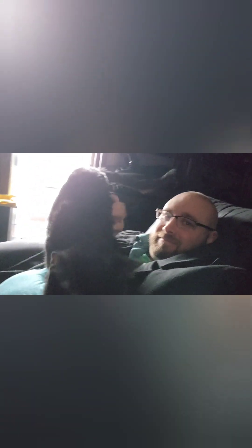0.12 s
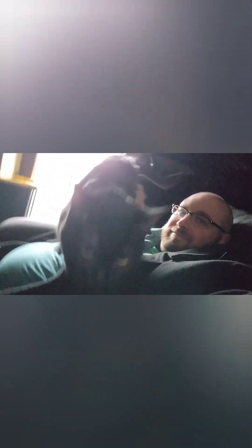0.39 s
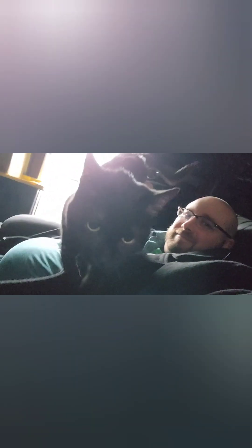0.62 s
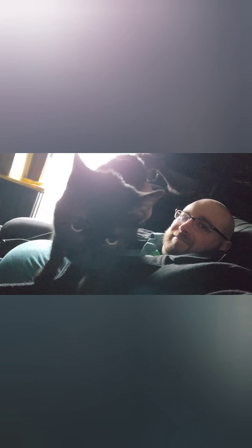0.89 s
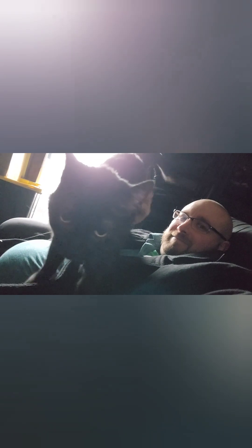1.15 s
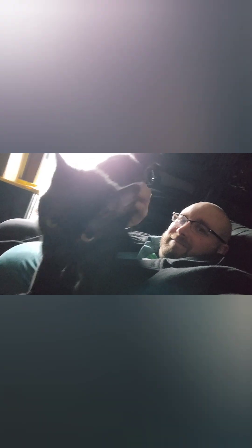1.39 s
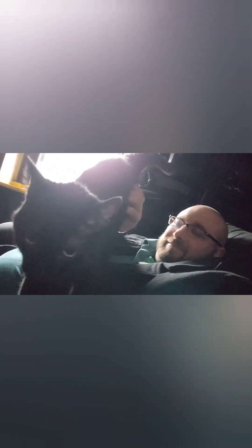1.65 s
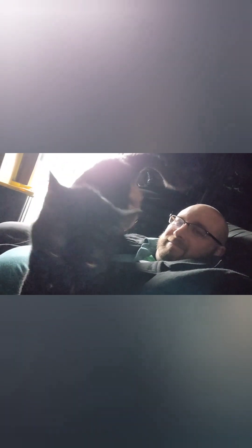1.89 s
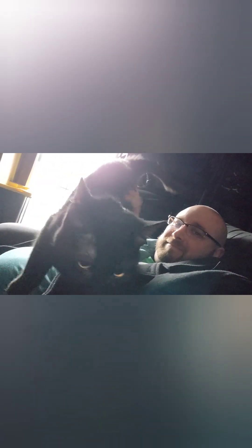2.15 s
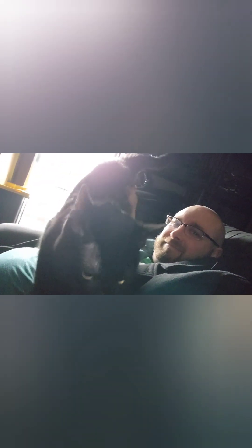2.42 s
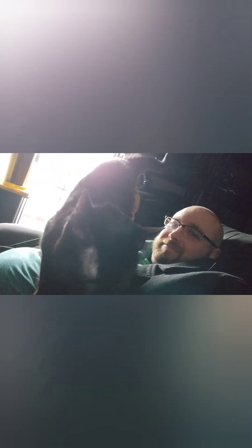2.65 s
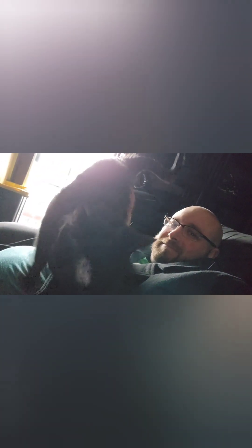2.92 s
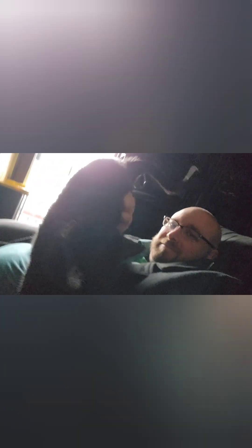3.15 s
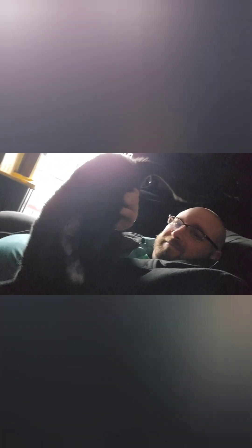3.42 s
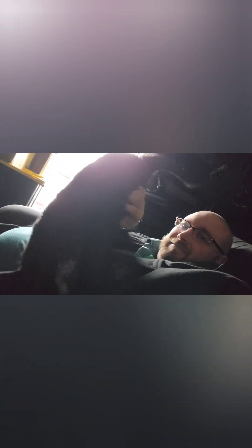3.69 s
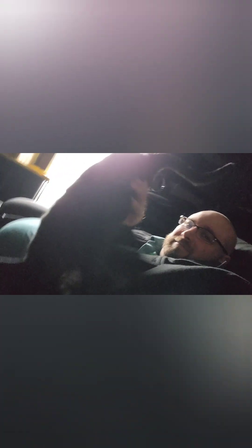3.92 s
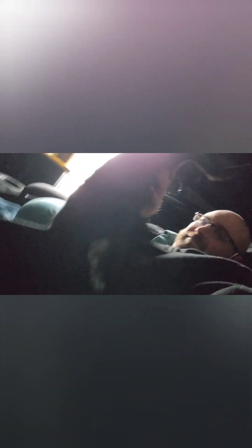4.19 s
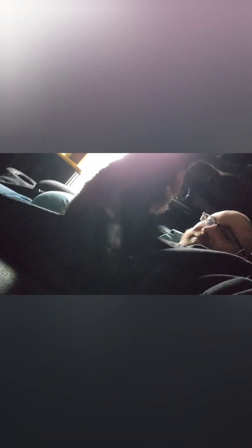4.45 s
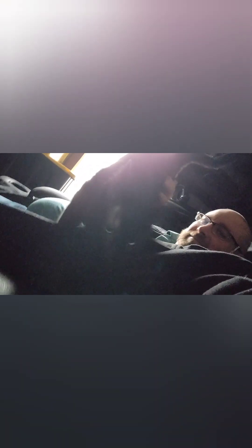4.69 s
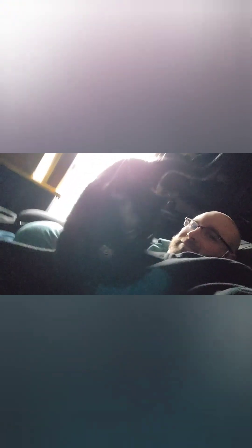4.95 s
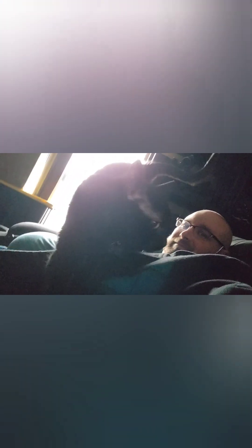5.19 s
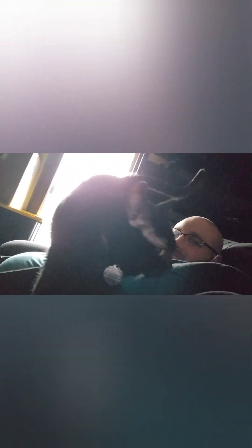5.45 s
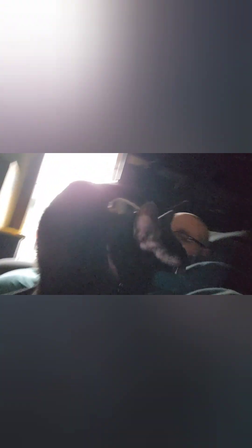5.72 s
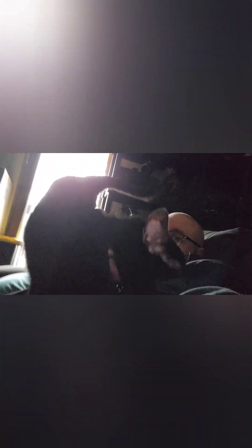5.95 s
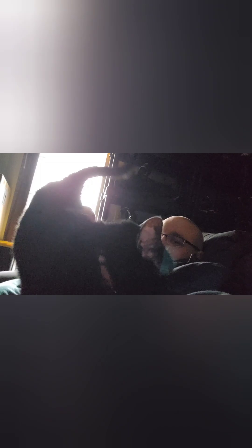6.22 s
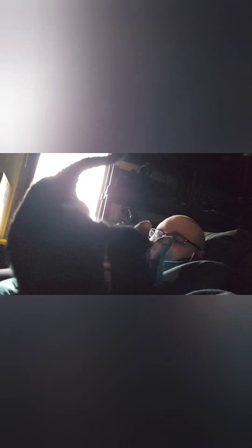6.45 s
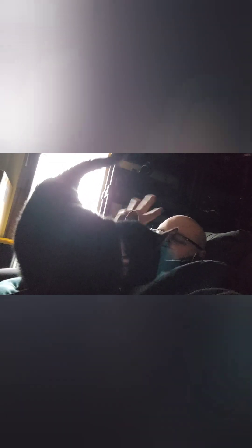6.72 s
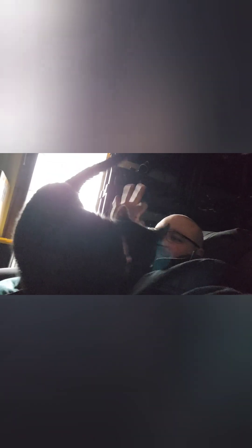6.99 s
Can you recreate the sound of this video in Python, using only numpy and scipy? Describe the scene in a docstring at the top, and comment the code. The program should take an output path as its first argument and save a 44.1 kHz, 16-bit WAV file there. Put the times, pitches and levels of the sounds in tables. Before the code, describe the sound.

Close, rough kitten purring at about 27 to 30 beats per second, with faint nose whistles, cloth rustle, ticks and quiet indoor rumble.

```python
"""On a sofa indoors, a kitten purrs close to a phone with two microphone ports. Its larynx beats about 26 to 34
times a second: sharp clicks with weaker after-clicks breathing out, longer puffs of air breathing in. They ring the
throat and chest, and the passing air whistles faintly in the nose. Fur and cloth make grainy rustle and short rings;
thin treble snaps, several on purr beats, lie among them. Noise makes the low rumble and hiss of the room, and
drifting tones make its hums."""
import sys
import numpy as np
from scipy import signal
from scipy.fft import rfft, irfft, next_fast_len
from scipy.io import wavfile
from scipy.ndimage import uniform_filter1d

SR = 44100
rng = np.random.default_rng(int(sys.argv[2]) if len(sys.argv) > 2 else 0)


def magnitude_from_level(level_db):
    """Linear magnitude for a level in decibels (20 dB per decade)."""
    exponent = np.asarray(level_db, float) / 20
    return 10 ** exponent


def transcribe(signal):
    """Save signal, clipped to [-1, 1], as a 16-bit WAV file at the path in sys.argv[1]."""
    frames = np.atleast_2d(signal).T
    limited = np.clip(frames, -1, 1)
    pcm = np.round(limited * 32767).astype(np.int16)
    wavfile.write(sys.argv[1], SR, pcm)


N = 313110
T = np.arange(N) / SR  # seconds
SIZE = next_fast_len(N)
F = np.maximum(np.fft.rfftfreq(SIZE, 1 / SR), 1)  # Hz
LOG_F = np.log(F)


def curve(rows):
    """Columns of a table, drawn as lines over time."""
    s, *columns = np.transpose(rows)
    return [np.interp(T, s, column) for column in columns]


def over_hz(points):
    """A table of frequency and value, read at every frequency."""
    hz, value = np.transpose(points)
    return np.interp(LOG_F, np.log(hz), value)


def colour(points):
    """Gain of a noise spectrum, silent well outside its ends."""
    return magnitude_from_level(over_hz(points)) * (F > 0.8 * points[0][0]) * (F < 1.2 * points[-1][0])


def modes(rows):
    """Causal resonances, each applied twice so that the valleys stay dark."""
    response = 0
    for k, (hz, width, db) in enumerate(rows):
        resonance = 1 / (1 + 1j * (F - hz ** 2 / F) / (1.37 * width)) ** 2
        response = response + (-1) ** k * magnitude_from_level(db) * resonance
    return response


def walk(rate):
    """Random levels held 1 / rate seconds and smoothed twice; spread near 1."""
    k = int(SR / rate)
    steps = np.repeat(rng.standard_normal(N // k + 1), k)
    return 1.3 * uniform_filter1d(uniform_filter1d(steps, k), k)[:N]


def swells(times, lengths, heights):
    """Sum of bell-shaped swells that rise faster than they fall."""
    rise_share = 0.55  # rise time as a share of fall time
    total = np.zeros(N)
    for s, length, height in zip(times, lengths, heights):
        age = (T - s) / max(length, 0.003)
        age = np.where(age < 0, age / rise_share, age)
        total += height * np.exp(-age ** 2 / 2)
    return total


def puff(age, length, rise=0.00074, fall=0.0035):
    """A gust of air opens quickly, holds for its length, dies away (all in s)."""
    late = np.clip(age, 0, None)
    return (1 - np.exp(-late / rise)) * np.exp(-np.clip(late - length, 0, None) / fall)


# Left microphone port against the right: pitch_hz [Hz], left_minus_right_db [dB]
PORT_BALANCE = [(60, -2), (110, 1), (200, 0.5), (380, -2.5), (700, -2), (1290, -9), (2380, -14.5),
                (4400, -14.5), (6200, 3), (8120, -0.5), (11500, -10), (15000, 2)]
# Sound that both ports share: pitch_hz [Hz], common_share [0-1 of power]
PORT_LIKENESS = [(30, .8), (120, .8), (300, .7), (700, .8), (1400, .6), (3000, .5), (8000, .45),
                 (15000, .3)]
# Later arrival at the right port: pitch_hz [Hz], lag_ms [ms]
PORT_LAG = [(60, .2), (300, .13), (900, 0), (1550, .13), (3200, .22), (15000, .19)]


def ports(envelope, response, strike=None):
    """Noise and strikes through a response of unit power; each port hears a shared and an own part of the noise."""
    likeness = over_hz(PORT_LIKENESS)
    left = magnitude_from_level(over_hz(PORT_BALANCE))
    right = np.exp(-2j * np.pi * F * over_hz(PORT_LAG) / 1000)
    sides = np.array([left, right]) * 2 / (1 + left)
    shared, *own = rfft(envelope * rng.standard_normal((3, N)), SIZE)
    both = np.sqrt(likeness) * shared + np.sqrt(1 - likeness) * np.array(own)
    if strike is not None:
        both = both + rfft(strike, SIZE)
    response = response / np.sqrt(np.mean(np.abs(response) ** 2))
    return irfft(both * sides * response, SIZE)[:, :N]


def whistle(envelope, hz, width=320):
    """A narrow band of air noise, shifted to follow the drifting centre."""
    rest = np.mean(hz)
    noise = ports(envelope, modes([(rest, width, 0)]))
    band = signal.hilbert(noise, SIZE)[:, :N]
    return (band * np.exp(2j * np.pi * np.cumsum(hz - rest) / SR)).real


def hum(rows, waver_db=1.5, lean=0.11):
    """A low tone drifts and wavers, fading at its ends; the ports meet it lean radians apart."""
    hz, db = curve(rows)
    fade = np.clip(np.minimum(T - rows[0][0], rows[-1][0] - T) / 0.04, 0, 1)
    phase = 2 * np.pi * np.cumsum(hz + 0.82 * walk(9)) / SR + lean / 2 * np.array([[1], [-1]])
    return np.sqrt(2) * fade * magnitude_from_level(db + waver_db * walk(12)) * np.sin(phase)


# Course of the rumble: start_s [s], level_db [relative dB]
RUMBLE = [(0, -51.5), (.3, -47.5), (.45, -49.5), (1.5, -49), (2.3, -47.5), (2.8, -52.5), (3.2, -50.5),
          (3.55, -53), (4.1, -50.5), (4.5, -50.5), (4.9, -50), (5.6, -51), (6.1, -50), (6.5, -50),
          (6.85, -49.5), (7.1, -54.5)]
# Spectrum of the rumble: pitch_hz [Hz], density_db [relative dB per Hz]
RUMBLE_COLOUR = [(8.8, -36), (15, -4.5), (25, 1), (44, -5.5), (59, 3.5), (94, 2), (107, 1), (173, -17),
                 (220, -16.5), (260, -20), (340, -35.5), (570, -120)]
# Swells of the rumble at the right port only: start_s [s, the peak], gain_db [dB], length_s [s]
RIGHT_SWELLS = [(3.139, 8.5, 0.034), (3.295, 9.5, 0.087), (4.193, 15, 0.044), (5.182, 9.5, 0.025),
                (5.468, 15.5, 0.026), (5.715, 13, 0.042), (5.94, 10, 0.044)]
# The higher hum: start_s [s], pitch_hz [Hz], level_db [dB]
HUM_HIGH = [(0.55, 93, -49), (0.82, 93, -49.5), (1.44, 97.9, -42.5), (1.8, 101.5, -46.5),
            (2.39, 103.2, -52.5), (2.73, 93.4, -53.5), (2.85, 87, -76)]
# The lower hum, one list for each stretch: start_s [s], pitch_hz [Hz], level_db [dB]
HUM_LOW = [
    [(1.3, 63.7, -57), (2.006, 62.98, -43), (2.27, 66.6, -38), (2.462, 63.3, -50.5), (2.55, 66, -52)],
    [(4.15, 61.5, -52), (4.3, 62.87, -53.5), (4.956, 62.96, -50.5), (5.034, 62.1, -63),
     (5.492, 63.3, -52.5), (5.7, 62.3, -55.5)],
]
# Spectrum of the room hiss: pitch_hz [Hz], density_db [relative dB per Hz]
ROOM_COLOUR = [(88, -31), (150, 2.5), (189, -10.5), (346, -9), (490, -17), (709, -13), (1400, -16.5),
               (1770, -43), (2020, -15.5), (2300, -21), (2710, -31), (3490, -22.5), (4850, -34),
               (6000, -38.5), (9950, -40), (15600, -48)]


def room(hiss_db=-70.5):
    """Low rumble, perhaps traffic through the walls, two hums in it, and a steady hiss of noise."""
    rumble = ports(magnitude_from_level(curve(RUMBLE)[0] - 2.5 + 1.8 * walk(8)), colour(RUMBLE_COLOUR))
    s, gain_db, length = np.transpose(RIGHT_SWELLS)
    rumble[1] *= magnitude_from_level(swells(s, length, gain_db))
    hums = hum(HUM_HIGH) + sum(hum(rows) for rows in HUM_LOW)
    hiss = ports(magnitude_from_level(hiss_db + 0.18 * walk(8.4)), colour(ROOM_COLOUR))
    return rumble + hums + hiss


# Strokes of fur and cloth: start_s [s, the peak], treble_db [relative dB], length_s [s],
# lower_db [relative dB, lower rustle against treble]
STROKES = [(0.12, -82.5, 0.09, 13), (0.445, -83, 0.19, 10), (0.68, -87, 0.028, -1),
           (0.962, -82.5, 0.047, 10), (1.23, -81.5, 0.065, 5), (1.464, -77.5, 0.13, 7.5),
           (1.748, -73, 0.021, 5), (2.022, -80.5, 0.024, -16), (2.102, -79, 0.0065, 3),
           (2.208, -76.5, 0.0067, 2), (2.297, -87, 0.033, 4), (2.574, -92, 0.025, 15),
           (2.857, -91, 0.12, 3), (3.18, -87, .08, 5), (3.454, -80, 0.17, 13), (3.734, -81, 0.022, 7.5),
           (4.052, -80, 0.069, 13), (4.311, -84, 0.11, 7), (4.623, -71, 0.0066, -8),
           (4.889, -79, 0.17, 5.5), (5.184, -65.5, 0.048, 7), (5.378, -72.5, 0.15, 8.5),
           (5.661, -81, 0.03, 20), (5.723, -75.5, 0.07, 9.5), (6.15, -79, 0.18, 8), (6.5, -82.5, .02, 8),
           (6.686, -89, .2, 13), (7.06, -92.5, .04, 9)]
# Spectrum of the fur: pitch_hz [Hz], density_db [relative dB per Hz]
FUR = [(1470, -9), (2500, 0.5), (3270, -1.5), (4440, -7), (4980, -3), (6810, -13.5), (7640, -6),
       (9460, -13), (11500, -11.5), (15600, -18)]
# Spectrum of the cloth: pitch_hz [Hz], density_db [relative dB per Hz]
CLOTH = [(240, -57), (400, -5), (434, -10), (526, -11), (720, -8.5), (780, -15.5), (1510, -2),
         (4500, -14.5), (5850, -54), (9900, -120)]


def rustle(grain_db=2.5):
    """Fur and cloth slide: grainy hiss whose two ranges flicker on their own, fibres catching in the lower one."""
    still_treble_db, still_lower_db = -102, -83.5  # relative levels while nothing moves
    crackles_per_s, crackle_db = 82, 23
    s, db, length, lower_db = np.transpose(STROKES)
    treble = magnitude_from_level(still_treble_db) + swells(s, length, magnitude_from_level(db))
    lower = magnitude_from_level(still_lower_db) + swells(s, length, magnitude_from_level(db + lower_db))
    grain = grain_db * np.minimum(rng.exponential(size=N // 128 + 1), 3).repeat(128)[:N]
    fur = ports(treble * magnitude_from_level(grain + 0.88 * walk(25) + 3.0), colour(FUR))
    chance = rng.random((2, N))
    catches = (chance[0] < crackles_per_s / SR) * (2 * chance[1] - 1)
    crackle = catches * lower * magnitude_from_level(crackle_db)
    cloth = ports(lower * magnitude_from_level(grain + 1.37 * walk(70) - 5), colour(CLOTH), crackle)
    return fur + cloth


# Ticks of claws and cloth: start_s [s], level_db [relative dB], centre_hz [Hz],
# thud_db [relative dB], thud_hz [Hz]
TICKS = [(0.414, -47, 1050, -49.5, 237), (0.528, -50, 654, -46, 154), (1.075, -49, 960, -67, 151),
         (2.775, -48, 1024, -54, 148.3), (3.117, -43.5, 1020, -46.5, 150), (4.075, -48, 1210, -44, 151),
         (5.123, -49, 1070, -40, 159), (5.385, -53, 1490, -66, 152), (5.45, -51.5, 615, -64, 152),
         (5.48, -55, 1187, -56, 180), (5.657, -52, 1430, -54, 168.8), (6.176, -69, 659, -49.5, 221),
         (6.387, -44, 870, -55, 335), (6.522, -48, 940, -52, 375), (6.825, -67, 670, -69, 154),
         (6.857, -39.5, 1520, -42.5, 206)]


def ticks():
    """Each tick is a short wide ring round its centre plus a dull thud; strong ticks ring more briefly."""
    t60_s, hardening = 0.046, 0.88  # ring time at -54.5 dB; dB of it lost for each dB of strength
    ring_partials = ((0.55, 0.17), (1, 0.76), (1.3, 0.47), (1.55, 0.33), (2.0, 0.2))  # (ratio, share)
    thud_partials = ((0.6, 0.59), (1, 0.6), (2.2, 0.15))
    out = np.zeros((2, N))
    age = np.arange(2048) / SR
    soft = 1 - np.exp(-age / 0.0004)  # the contact is not instant
    for s, db, hz, thud_db, thud_hz in TICKS:
        fall = np.exp(-np.log(1000) * age / (t60_s * magnitude_from_level(-hardening * (db + 54.5))))
        ring = sum(share * np.sin(2 * np.pi * ratio * hz * age) * fall ** ratio
                   for ratio, share in ring_partials)
        thud = sum(share * np.sin(2 * np.pi * ratio * thud_hz * age) for ratio, share in thud_partials)
        thud = magnitude_from_level(thud_db + 5.0) * thud * np.exp(-age / 0.0094)
        i = int(s * SR)
        out[:, i:i + len(age)] += soft * (magnitude_from_level(db + 1.5) * ring * np.array([[0.7], [1.3]]) + thud)
    return out


# Thin treble snaps, several on purr beats: start_s [s], level_db [relative dB], left_minus_right_db [dB]
SNAPS = [(0.084, -58.5, -12), (0.2275, -62, -5), (0.6316, -55, -2.5), (1.254, -55, -4), (1.458, -55, 1),
         (1.5858, -62, -4), (2.095, -57, -6), (2.17, -58, -6.5), (2.207, -52, -3), (2.319, -60, -3),
         (2.4663, -59.5, -6), (2.845, -64.5, -15), (3.912, -68, 16), (4.622, -55, -2.5), (4.895, -54, 1),
         (5.526, -54, 3), (6.1724, -58, 10), (6.502, -62, 11)]


def snaps():
    """Very short puffs of noise, kept to the treble."""
    out = np.zeros((2, N))
    age = np.arange(2048) / SR
    for s, db, pan_db in SNAPS:
        i = int(s * SR)
        burst = rng.standard_normal((2, len(age))) * puff(age, 0.0011, 0.00079, 0.0022)
        out[:, i:i + len(age)] += magnitude_from_level(db - 2 + np.array([[pan_db], [-pan_db]]) / 2) * burst
    treble = signal.butter(2, (4500, 11500), "band", fs=SR, output="sos")
    return signal.sosfilt(treble, out)


# Stretches of beats breathing out: start_s [s, first beat], end_s [s], first_rate [beats/s],
# last_rate [beats/s], after_click_db [dB against the click, before scatter]
STRETCHES_OUT = [(.069, .64, 26.9, 27.2, -3), (.658, .83, 27.6, 26.9, -20), (1.897, 2.015, 27.4, 26.2, -11),
                 (2.022, 2.64, 27, 27, -1), (3.768, 4.09, 26.2, 26.1, -12), (4.112, 4.25, 26.5, 26, -2),
                 (5.151, 5.6, 26.6, 26.4, -4), (5.625, 6.1, 25.8, 27.4, -2)]
# Stretches of beats breathing in: start_s [s, first beat], end_s [s], first_rate [beats/s],
# last_rate [beats/s], puff_ms [ms, before scatter]
STRETCHES_IN = [(.956, 1.35, 29, 30.6, 19), (1.361, 1.79, 29, 30.6, 17), (2.822, 3.22, 29.2, 28, 20),
                (3.268, 3.72, 28.6, 28, 9), (4.562, 5.12, 30, 29, 19), (6.172, 6.5, 34.2, 28.2, 11),
                (6.522, 6.85, 26.8, 32.6, 13)]


def stretches():
    """All stretches of breath as (start, end, first rate, last rate, puff ms, after-click dB, inward)."""
    out_puff_ms, in_after_db = 3, -14
    out = [(*row[:4], out_puff_ms, row[4], 0) for row in STRETCHES_OUT]
    return out + [(*row, in_after_db, 1) for row in STRETCHES_IN]


# Throat level of each stretch of beats breathing out in turn (a breath may hold two stretches):
# level_db [relative dB, mid-stretch]
OUT_DB = [-68, -70.5, -63, -69, -65.5, -71.5, -72, -71]
# Throat level of each stretch of beats breathing in, in turn: level_db [relative dB, mid-stretch]
IN_DB = [-66.5, -65.5, -74, -73, -68, -70, -72]
# Brief rises and dips of throat and breath level: start_s [s, the extreme], gain_db [dB], length_s [s]
RISES_AND_DIPS = [(0.214, 3.5, 0.085), (0.418, 12.5, 0.019), (0.499, 8.5, 0.039), (0.639, 9, 0.084),
                  (0.952, 4, 0.025), (1.214, 10, 0.04), (1.52, 3.5, 0.084), (1.76, -2.5, .02),
                  (1.95, -1, 0.0069), (2.216, 7, 0.033), (2.852, 14, 0.085), (3.118, 10, 0.026),
                  (3.679, 7.5, 0.024), (3.787, 5, 0.013), (3.924, 3, 0.041), (4.14, 4.5, 0.045),
                  (4.632, 8.5, 0.04), (4.932, 9, 0.067), (5.117, 5, .02), (6.87, 27, 0.019)]


def effort():
    """Throat level in dB, sagging in each stretch, raised or lowered by brief swells; share of breathing in."""
    sag_db_per_s = (2.5, 6.5)  # out, in
    pause_db = -80.0  # air between stretches
    ease_s, turn_s = 0.03, 0.092  # time in which effort settles; in which the airflow reverses
    db, inward_share = np.full(N, pause_db), np.full(N, 0.5)
    for (start, end, *_, inward), level_db in zip(stretches(), OUT_DB + IN_DB):
        on = (T >= start - ease_s) & (T < end)
        db[on] = level_db - sag_db_per_s[inward] * (T[on] - (start + end) / 2)
        inward_share[on] = inward
    s, gain_db, length = np.transpose(RISES_AND_DIPS)
    settled_db = uniform_filter1d(db, int(ease_s * SR))
    return settled_db + swells(s, length, gain_db), uniform_filter1d(inward_share, int(turn_s * SR))


def larynx(scatter_db=2.5, after_scatter_db=4.5, leak_db=-18):
    """Air let through by each beat (rows: out, in), the slaps of the folds, and the air that follows."""
    beats, air, slaps = np.zeros((2, N)), np.zeros(N), np.zeros(N)
    for start, end, rate0, rate1, ms, after_db, inward in stretches():
        on = (T >= start) & (T < end)
        age = T[on] - start
        turns = (rate0 + (rate1 - rate0) * age / (end - start) / 2) * age
        period = 2 / (rate0 + rate1)
        # eight random numbers for each beat
        chance = np.clip(rng.standard_normal((40, 8)), -2, 2)[turns.astype(int)].T
        into = turns % 1 * period
        # the folds touch once hard, then twice more weakly later in the cycle: (age, size, length)
        touches = [(into - 0.00048 * np.abs(chance[1]), magnitude_from_level(scatter_db * chance[0]),
                    ms / 1000 * magnitude_from_level(chance[2]))]
        for k, at in enumerate((0.45, 0.7)):
            when = into - (at + 0.0494 * chance[5 + k]) * period
            touches.append((when, magnitude_from_level(after_db + after_scatter_db * chance[3 + k]), 0.002))
        beat = sum(size * puff(when, length) for when, size, length in touches) + magnitude_from_level(leak_db)
        beats[inward, on] = beat / np.sqrt(np.mean(beat ** 2))
        slap = sum(size * puff(when, 0, 0.00005, 0.0001) for when, size, _ in touches)
        slaps[on] = (1 - inward) * slap / np.sqrt(np.mean(slap ** 2))  # only breathing out
        gust = magnitude_from_level(3.9 * chance[7]) * puff(into - 0.23 * inward * period, 0.0016, 0.0019, 0.011) + 0.34
        air[on] = gust / np.sqrt(np.mean(gust ** 2))
    air[air == 0] = 0.39  # between stretches
    return beats, slaps, air


# Resonances of the throat breathing out: pitch_hz [Hz], width_hz [Hz, roughly], level_db [relative dB]
THROAT_OUT = [(672, 125, 1.5), (1048, 213, -2), (1286, 94, 5.5), (1460, 118, -0.5), (2270, 490, -10)]
# Resonances of the throat breathing in: pitch_hz [Hz], width_hz [Hz, roughly], level_db [relative dB]
THROAT_IN = [(749, 220, 4), (1050, 340, -2), (1430, 119, 4), (2260, 210, -9.5)]


def throat(out, inward, slaps, throat_db, slap_db=-10, deep_db=-4, bright_db=-4.5):
    """Puffs and slaps ring the throat, which changes shape: one slap rings deeper, the next brighter."""
    sound = ports(inward * magnitude_from_level(throat_db), modes(THROAT_IN))
    for rows, db in ((THROAT_OUT[:2], deep_db), (THROAT_OUT[2:], bright_db)):
        gain = magnitude_from_level(throat_db + db) * magnitude_from_level(3.5 * walk(45))
        sound += ports(out * gain, modes(rows), slaps * gain * magnitude_from_level(slap_db))
    return sound


# Resonances of the chest: pitch_hz [Hz], width_hz [Hz, roughly], level_db [relative dB]
CHEST = [(201, 116, -3.5), (336, 82, 0), (431, 145, -17)]


def chest(out, inward, slaps, db):
    """The chest thumps as the folds tense, a moment before they slap."""
    lead = -int(0.008 * SR)
    gain = magnitude_from_level(db - 9 + 3.46 * walk(30))
    thumps = np.roll(slaps, lead) * magnitude_from_level(-3)
    flow = np.roll(out, lead) + 1.82 * inward + 0.11
    return ports(flow * gain, modes(CHEST), thumps * gain)


# The lower nose whistle: pitch_hz [Hz, before its glide], width_hz [Hz, roughly], level_db [unused]
NOSE_LOW = [(3202, 313, 0)]
# Flares of the low whistle as air is drawn in: start_s [s, the peak], level_db [dB]
SNIFFS = [(0.951, -79), (2.76, -75), (3.1, -98), (4.558, -74)]


def low_whistle(air, db):
    """Air whistles low in the nose, flaring and raised in pitch at each sniff, then sinking."""
    sniff_length_s, up_hz, sink_hz_per_s, sink_s = 0.03, 170, 400, 0.8
    s, sniff_db = np.transpose(SNIFFS)
    latest = np.r_[0, s][np.searchsorted(s - 2 * sniff_length_s, T)]
    since = np.minimum(T - latest, sink_s)
    hz, width, _ = NOSE_LOW[0]
    envelope = air * magnitude_from_level(db) + swells(s, sniff_length_s + 0 * s, magnitude_from_level(sniff_db))
    return whistle(envelope, hz + up_hz - sink_hz_per_s * since, width)


# Highest resonances of the nose: pitch_hz [Hz], width_hz [Hz, roughly], level_db [relative dB]
NOSE_HIGH = [(6530, 300, 3), (7520, 470, 3.5), (9780, 580, -0.5), (12400, 990, -6)]
# How squarely the nose points at the phone: start_s [s], gain_db [relative dB, highest whistles]
AIM = [(0, 2), (.7, -0.5), (1, 6.5), (1.7, 5.5), (2.2, 1), (2.9, 4), (3.5, 3), (4.2, 1), (4.65, -3.5),
       (5, -5), (5.6, 1), (6.1, 2.5), (7.1, -4)]


def nose(high_air, inward_share, nose_db=-8):
    """Passing air rings the nose lower breathing out, higher breathing in."""
    lower = ports(high_air * (1 - 0.38 * inward_share), modes(NOSE_HIGH[:2]))
    higher = ports(high_air * (0.39 + 0.51 * inward_share), modes(NOSE_HIGH[2:]))
    return magnitude_from_level(nose_db - 0.5 + curve(AIM)[0]) * (lower + higher)


# The kitten turns and shifts: start_s [s], chest_db, low_whistle_db, high_whistle_db
# [each relative dB, added to the throat level], high_whistle_hz [Hz]
POSTURE = [(0, -2, -22, -17, 5097), (.4, -5.5, -20, -13, 5072), (.77, -14, -19, -14.5, 4955),
           (.93, -3.5, -4.5, -18.5, 4684), (1.22, -4.5, -17, -21, 4740), (1.38, -1, -6.5, -15, 4754),
           (1.5, -8.5, -10.5, -19.5, 4750), (1.9, -13, -14, -14.5, 4556), (2.0, -11, -18, -16, 4554),
           (2.07, 2.5, -16, -12.5, 5174), (2.6, -3, -20, -17, 5110), (2.75, -3, -15.5, -13, 4788),
           (3.3, 4, -10.5, -14.5, 4830), (3.6, 0.5, -4, -18, 4760), (3.9, 3.5, -36, -17.5, 5147),
           (4.1, 11, -22, -27.5, 5014), (4.35, 1, -13, 5, 4797), (4.7, 0, -16.5, -13, 5017),
           (5.0, -2.5, -14, -9, 5040), (5.22, -3.5, -15, -1.5, 5073), (5.4, 7.5, -11, -2, 4898),
           (5.8, 2, -14.5, -12, 4775), (6.2, 8.5, -9.5, -13, 4817), (6.7, 7, -18, -15, 4750),
           (7.1, 13, -16, -20, 4663)]


def kitten():
    """One larynx drives throat, chest and nose, whose balance shifts as the kitten moves."""
    throat_db, inward_share = effort()
    chest_db, low_db, high_db, high_hz = curve(POSTURE)
    (out, inward), slaps, air = larynx()
    out = out * magnitude_from_level(-8)
    purr = throat(out, inward, slaps, throat_db) + chest(out, inward, slaps, throat_db + chest_db)
    low = low_whistle(air, throat_db + low_db + 2.7 * walk(40))
    high_air = air * magnitude_from_level(throat_db + high_db + 4.0 * walk(30))
    return purr + low + nose(high_air, inward_share) + whistle(high_air, high_hz)


def scene():
    """Kitten, rustle, ticks, snaps and room at the two ports."""
    return kitten() + rustle() + ticks() + snaps() + room()


def band_limit(x):
    """A steep low-pass at the top of the band."""
    return signal.sosfilt(signal.butter(12, 15700, fs=SR, output="sos"), x)


def record(dry):
    """The phone takes the finished mix of its two ports."""
    return band_limit(dry)


dry = scene()
out = record(dry)
transcribe(out)
```